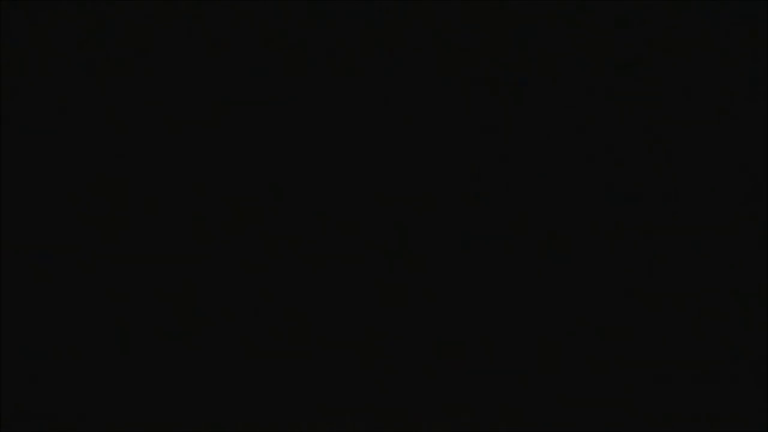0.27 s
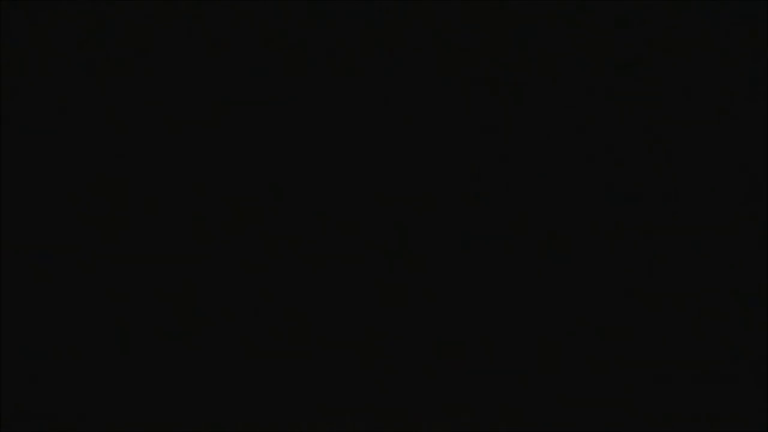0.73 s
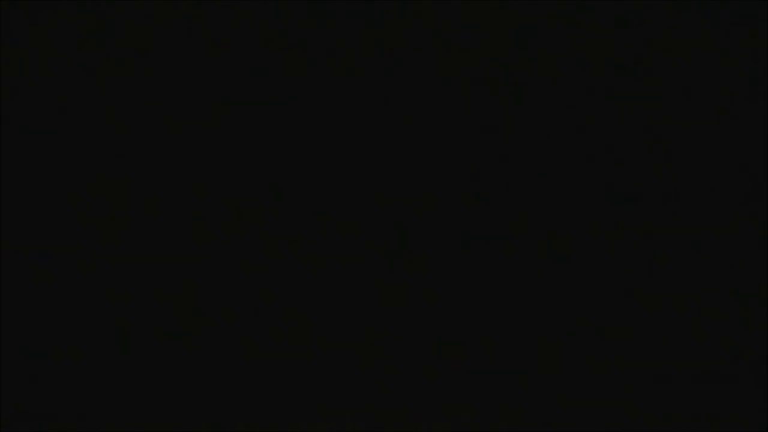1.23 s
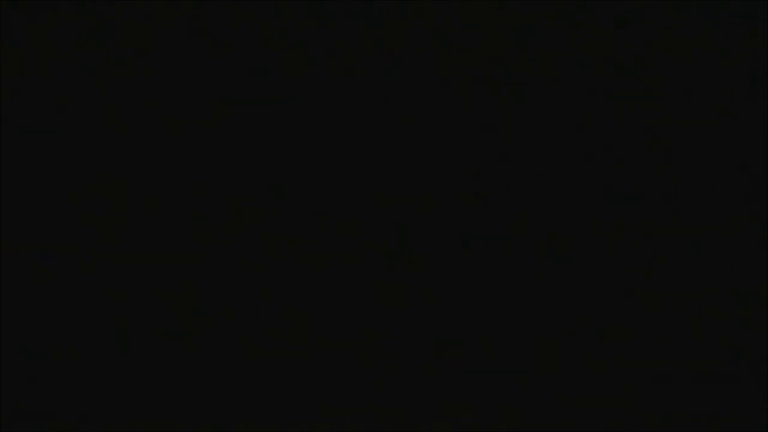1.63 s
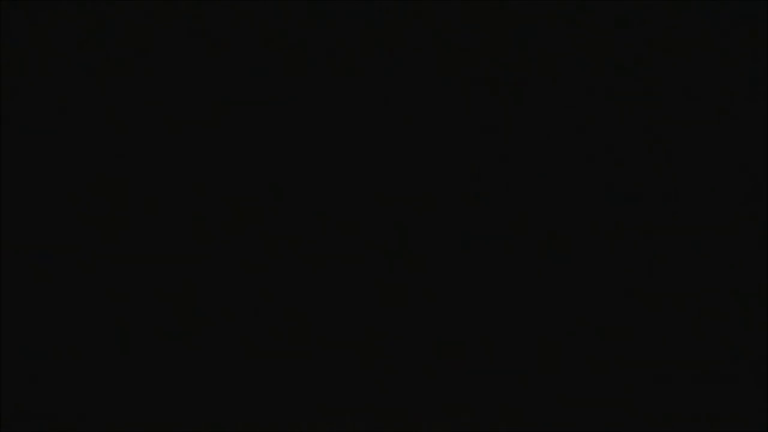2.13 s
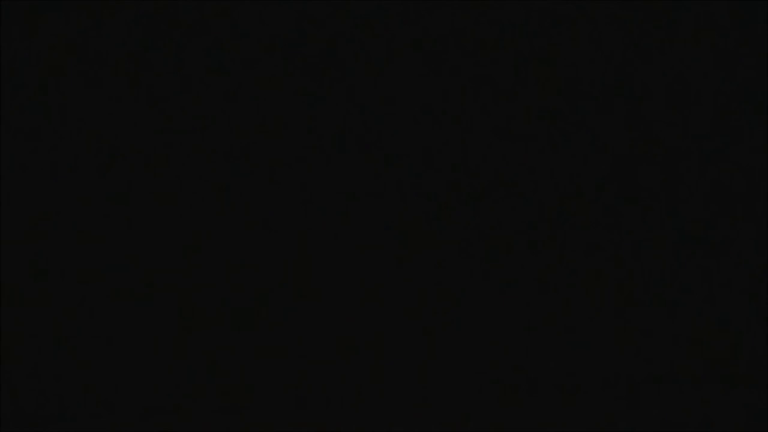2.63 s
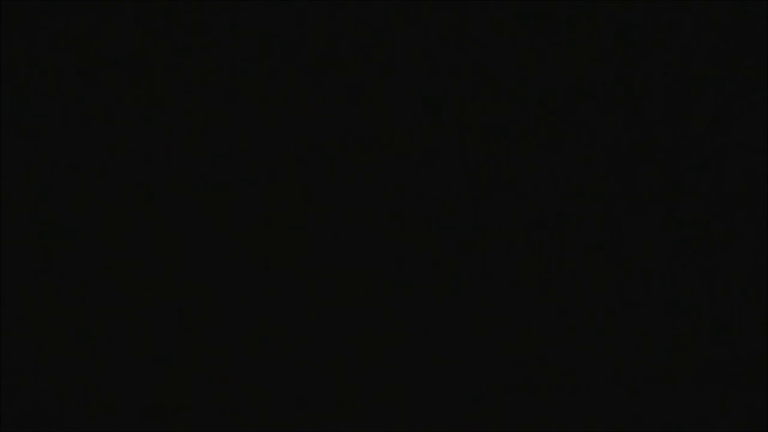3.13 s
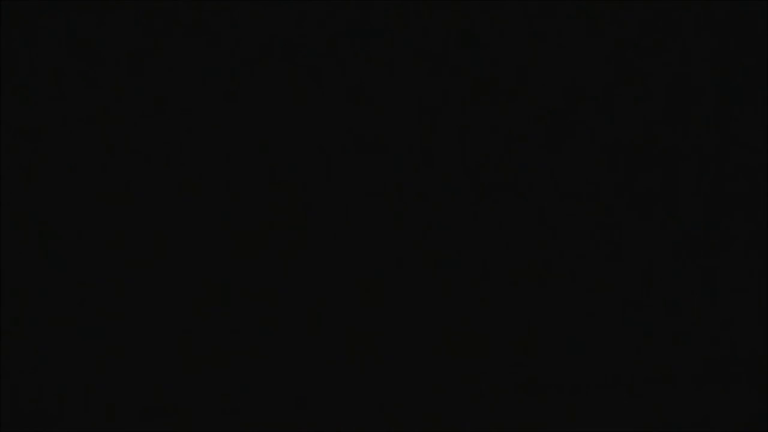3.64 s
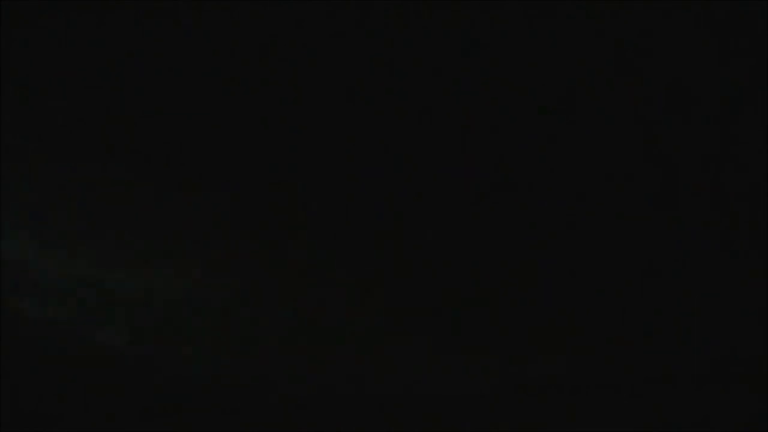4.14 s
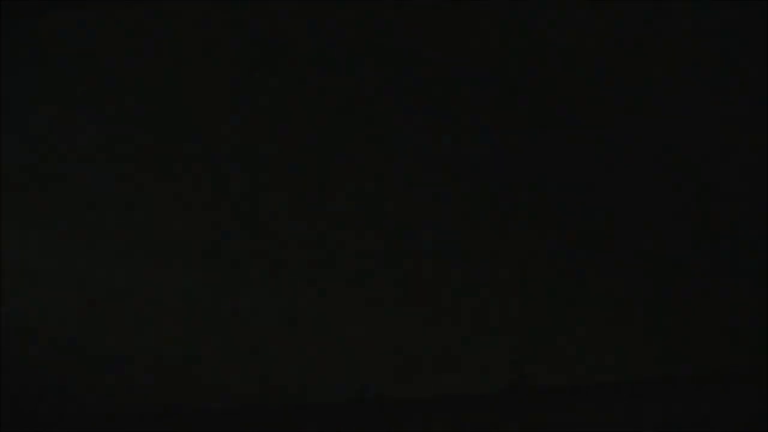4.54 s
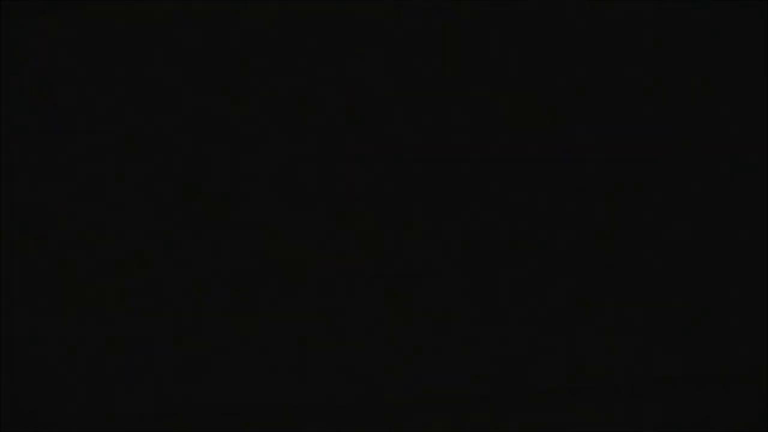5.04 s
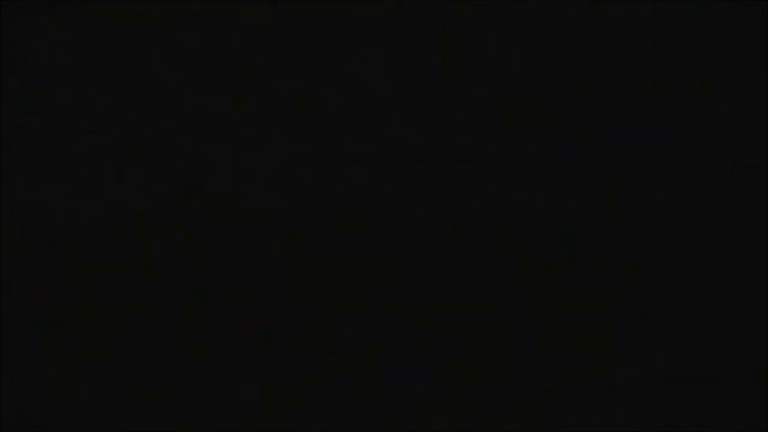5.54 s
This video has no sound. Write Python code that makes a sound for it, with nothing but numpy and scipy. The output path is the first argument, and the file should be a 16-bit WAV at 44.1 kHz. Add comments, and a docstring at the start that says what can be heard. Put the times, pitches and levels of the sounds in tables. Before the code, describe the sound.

A long peal of thunder starts abruptly, mid-roll, with dense low-mid rumbling and quick muffled crackles. Strong surges come just after one second and again around three and a half, with hollow booms between them. After four seconds it recedes into soft grumbles, and a steady light hiss rises. Open night air, mono microphone, automatic level, little deep bass.

```python
"""Distant thunder over soft hiss

A dense train of shock fronts, dulled by the air, makes a roll that swells and fades; narrow bands of it boom.
Sharper claps crackle out of the roll, each a leading front with scattered fronts, echoes and a thud.
Filtered noise and random pulses make a steady hiss like light rain. Pressure waves too deep to hear push
the recorder's gain down; it creeps back, so the hiss rises as the thunder dies away."""
import sys
import numpy as np
from scipy import signal
from scipy.io import wavfile
from scipy.ndimage import uniform_filter1d

SR = 44100
rng = np.random.default_rng(int(sys.argv[2]) if len(sys.argv) > 2 else 0)


def store_wav(level_fs):
    """Save 16-bit WAV to argv[1]."""
    pcm = np.round(np.clip(np.atleast_2d(level_fs), -1, 1) * 32767)
    wavfile.write(sys.argv[1], SR, pcm.T.astype(np.int16))


N = 254456
TIME, FREQ = np.arange(N) / SR, np.fft.rfftfreq(N, 1 / SR)  # s, Hz

# colour of the thunder, its treble lost in the air: f/Hz, relative density/dB per Hz
THUNDER_COLOUR = [(25, -66), (43, -24), (57, -37), (74, -15.5), (100, -16), (145, -6), (185, 1), (420, 3),
                  (600, -2), (950, -13.5), (1300, -24), (2000, -35), (3000, -53), (6000, -64)]


def gain_of(db):
    """Turns decibels into an amplitude factor."""
    return 10 ** (np.asarray(db) / 20)


def evened(x):
    """Scales to rms 1."""
    return x / np.sqrt(np.mean(x ** 2) + 1e-20)


def smoothed_twice(x, size):
    """Two moving averages in a row, each size samples long."""
    return uniform_filter1d(uniform_filter1d(x, size), size)


def steadied(x, span_s):
    """Evens out the slow swells of a random texture and keeps its grain."""
    power = smoothed_twice(x ** 2, int(span_s * SR))
    return x / np.sqrt(abs(power) + 1e-12)


def butter(x, order, hz, kind="low"):
    """Runs x through a causal Butterworth filter."""
    return signal.sosfilt(signal.butter(order, hz, kind, fs=SR, output="sos"), x)


def read(points, hz):
    """Reads a spectrum table on a log-frequency axis."""
    f, value = np.transpose(points)
    return np.interp(np.log(hz + 1), np.log(f), value)


def band(lo_hz, hi_hz):
    """Gain in dB of a band with steep, smooth edges."""
    low_edge = 1 + (lo_hz / (FREQ + 1)) ** 12
    high_edge = 1 + (FREQ / hi_hz) ** 12
    return -10 * np.log10(low_edge * high_edge)


def colour(x, db):
    """Minimum-phase filter shaped by db, scaled to unit energy: each pulse keeps its sharp front."""
    log_gain = np.log(gain_of(np.maximum(db - db.max(), -100)))
    circle = np.concatenate([log_gain, log_gain[-2:0:-1]])
    # the Hilbert transform of the log gain gives the minimum phase
    spectrum = np.exp(np.conj(signal.hilbert(circle)))
    taps = np.fft.ifft(spectrum).real[:8192]
    return signal.oaconvolve(x, taps / np.linalg.norm(taps))[:N]


def bell(top_s, length_s):
    """A smooth rise and fall of height 1, down 17 dB at length_s either side of its top."""
    return np.exp(-2 * ((TIME - top_s) / length_s) ** 2)


def shocks(per_s, spread_db):
    """Shock fronts from the kinks of the lightning channel: random times, many weak and a few strong."""
    size = gain_of(spread_db * np.minimum(rng.exponential(1, N), 4))
    sign = rng.choice([-1, 1], N)
    arrives = rng.random(N) < per_s / SR
    return evened(size * sign * arrives)


def mirrored(fronts, share, delay_s, drift):
    """Each front returns from the ground; the delay wanders as the sound moves along the channel."""
    knots = np.arange(0, TIME[-1] + .2, .2)
    wander = np.interp(TIME, knots, rng.standard_normal(len(knots)))
    delay = delay_s * np.exp(drift * wander)
    source = np.arange(N) - (delay * SR).astype(int)
    return fronts + share * fronts[np.clip(source, 0, N - 1)]


def peals(x, db):
    """Three peals from different parts of the sky: nearby echoes favour and cancel different bands in each."""
    # echo ripple of each peal, added to the colour: f/Hz, distance to 1/e^2 of the lift/Hz, lift/dB
    first_peal = [(151.7, 16, 5), (194, 18, 4.5), (254, 13, -5), (362.5, 49, -2.5), (423, 39, 0.5),
                  (456.6, 13, -8), (519, 39, -4.5), (564, 76, 4), (609, 33, -4.5), (663, 6.3, -12.5),
                  (800, 72, -3), (955, 50, 4.5), (1130, 37, -5.5)]
    second_peal = [(111, 19, 3.5), (171.4, 38, 8), (184, 8.7, -0.5), (222, 20, 1.5), (301, 23, -7),
                   (341, 18, -4.5), (404, 50, 1.5), (515, 110, -5.5), (624.7, 11.5, 7.5), (677, 16, 4),
                   (805, 14, 9.5), (830, 26, -3), (1277, 15, 6)]
    third_peal = [(180, 122, 9.5), (251, 56, -6), (307.4, 42, 6), (348, 22, -7.5), (510, 83, 1),
                  (570, 10, -1), (660, 34, 4.5), (792, 36, 4), (843, 60, -2.5), (900, 67, 4),
                  (987, 36, 5.5)]
    # middle of the fade from each peal to the next: t/s
    peal_changes = [2.165, 3.9]
    fade_edges = np.add.outer(peal_changes, [-.08, .08]).ravel()
    turn = np.interp(TIME, fade_edges, [0, 1, 1, 2])
    out = np.zeros(N)
    for k, bands in enumerate([first_peal, second_peal, third_peal]):
        ripple = sum(lift * np.exp(-2 * ((FREQ - hz) / width) ** 2) for hz, width, lift in bands)
        presence = np.maximum(1 - abs(turn - k), 0)
        out += presence * colour(x, db + ripple)
    return out


def lumps(depth_db, span_s):
    """A slow random gain, depth_db rms: the roll is never quite even."""
    drift = smoothed_twice(rng.standard_normal(N), int(span_s * SR))
    return gain_of(depth_db * evened(drift))


def roll_levels():
    """Envelopes of body, deep rumble and crackle: each swell adds its power to the steady roll."""
    # steady roll under the swells: t/s, body level/dB, deep rumble level/dB, crackle level/dB
    steady_roll = [(0.0, -19.5, -24.5, -33), (0.45, -26.5, -35, -33), (0.751, -23, -31.5, -33.5),
                   (1.02, -22.5, -23, -34), (1.4, -19.5, -27, -32.5), (1.6, -20.5, -32.5, -35),
                   (2.05, -19.5, -24, -32), (2.7, -23, -25, -36.5), (3.1, -27, -41, -38.5),
                   (3.4, -23.5, -28.5, -37), (3.6, -20.5, -25, -37), (3.88, -24, -26.5, -39.5),
                   (4.6, -29, -38.5, -45), (5.15, -34.5, -43, -51.5), (5.77, -39.5, -42.5, -66)]
    # a stretch of the lightning channel heard all at once:
    # t of the top/s, time from top to -17 dB/s, body level/dB, deep rumble level/dB
    swells = [(0.007, 0.035, -12.5, -14.5), (0.17, 0.12, -14.5, -21), (0.39, 0.11, -16, -19.5),
              (0.507, 0.07, -17.5, -20.5), (0.648, 0.11, -18, -27.5), (0.788, 0.035, -22, -39),
              (0.86, 0.02, -16.5, -29), (0.92, 0.048, -16, -23), (1.153, 0.044, -9.5, -14.5),
              (1.204, 0.027, -15, -20), (1.257, 0.048, -14.5, -27), (1.34, 0.07, -19.5, -28),
              (1.49, 0.025, -15.5, -23.5), (1.535, 0.084, -16, -27), (1.66, 0.079, -16.5, -28),
              (1.775, 0.07, -29, -25.5), (1.856, 0.11, -17, -30), (1.91, 0.015, -17.5, -23.5),
              (2.024, 0.018, -25, -27), (2.468, 0.038, -17.5, -17.5), (2.605, 0.043, -18, -23),
              (2.87, 0.067, -17, -17.5), (2.914, 0.051, -20, -26), (3.006, 0.098, -19.5, -20.5),
              (3.322, 0.07, -22, -26), (3.516, 0.028, -21, -31), (3.994, 0.038, -26.5, -22.5),
              (4.13, 0.055, -24.5, -23), (4.213, 0.053, -20.5, -29), (4.347, 0.051, -20, -31),
              (4.454, 0.05, -28.5, -42), (4.57, 0.035, -27.5, -32), (4.61, 0.033, -32, -32),
              (4.77, 0.045, -27.5, -39.5), (4.87, 0.04, -37, -43), (4.935, 0.021, -33, -45),
              (5.03, 0.026, -40, -39), (5.116, 0.04, -38, -38), (5.285, 0.059, -35, -44),
              (5.488, 0.075, -36, -34.5), (5.585, 0.025, -38, -33), (5.645, 0.056, -38, -41)]
    swell_crackle_db = -17  # relative to the body of the swell
    s, *levels = np.transpose(steady_roll)
    power = gain_of([np.interp(TIME, s, db) for db in levels]) ** 2
    for top_s, length_s, body_db, deep_db in swells:
        tops = gain_of([body_db, deep_db, body_db + swell_crackle_db])
        power += np.outer(tops, bell(top_s, length_s)) ** 2
    return np.sqrt(power)


def roll():
    """Far fronts merge into a deep rumble; nearer ones stay apart and crackle."""
    body, deep, crackle = roll_levels() * lumps(depth_db=1.02, span_s=0.024)
    air = read(THUNDER_COLOUR, FREQ)
    fronts = shocks(per_s=1500, spread_db=1)
    fronts = mirrored(fronts, share=0.27, delay_s=.008, drift=.15)
    rumble = deep * steadied(peals(fronts, air + band(4.7, 242.5)), span_s=0.043)
    middle = body * steadied(peals(fronts, air + band(288.4, 904)), span_s=0.031)
    top = crackle * steadied(peals(fronts, air + band(1025, 8000)), span_s=0.017)
    return rumble + middle + top


def hiss():
    """A fine, even hiss of countless far drops: noise plus random pulses, coloured together."""
    hiss_colour = [(100, -11.5), (800, 6.5), (2000, 1.5), (3200, 1.5), (4000, -2), (4800, -1.5),
                   (6000, -5.5), (7200, -6), (9000, -9.5), (11000, -14), (13500, -19.5), (15600, -22.5)]  # spectrum of the drops: f/Hz, relative density/dB per Hz
    hiss_db = -45.5  # rms, ahead of the gain control
    drops = rng.standard_normal(N) + 0.54 * shocks(per_s=3000, spread_db=4.0)
    return gain_of(hiss_db) * evened(colour(drops, read(hiss_colour, FREQ)))


def pressure_waves():
    """Slow pushes of air from the thunder, below hearing."""
    # pushes of air, ahead of the low cut: t of the peak/s, peak level/dB
    waves = [(0.01, -6.5), (0.131, -3.5), (0.23, -3.5), (0.413, -2), (0.876, -10.5), (0.966, -5),
             (1.147, -4), (1.481, -8.5), (1.544, -5), (1.896, -9.5), (2.037, -5.5), (2.15, -3),
             (2.271, -2.5), (2.462, -7), (2.597, -6.5), (2.863, -7), (3.03, -8.5), (3.216, -10),
             (3.358, -8.5), (3.559, -12), (3.642, -3.5), (3.791, -5), (3.9, -7), (4.231, -14),
             (4.338, -15.5)]
    wave_length_s = 0.061  # from the peak to -17 dB
    return sum(gain_of(db) * bell(s, wave_length_s) for s, db in waves)


def burst(start_s, length_s, level_db, t60, rise_s):
    """Envelope of a clap: quick rise, hold while its fronts arrive, exponential decay."""
    age = TIME[:SR]
    fade = np.maximum(age - length_s, 0) / max(t60, .02)
    rise = 1 - np.exp(-age / rise_s)
    decay = np.exp(-np.log(1000) * np.minimum(fade, 2))
    shape = gain_of(level_db) * rise * decay
    return np.pad(shape, (round(start_s * SR), N))[:N]


def claps():
    """A leading front, then scattered ones and their echoes, dulled by the clap's own path, over a thud."""
    # one row a clap: t/s, length of its cluster of fronts/s, crack level/dB,
    # leading front over the crack/dB, thud level/dB, top of the crack's treble/Hz
    clap_rows = [(0.08, 0.022, -27, 12, -15, 1800), (0.112, 0.01, -28, 20, -33, 2100),
                 (0.166, 0.007, -33, 17, -16, 1700), (0.323, 0.035, -26, 13, -22, 1400),
                 (0.378, 0.008, -29, 24, -15, 1400), (0.487, 0.0087, -28, 15, -17, 1700),
                 (0.635, 0.0071, -32, 18, -26, 1690), (0.825, 0.004, -35, 29.5, -22, 5500),
                 (0.837, 0.015, -18.5, 17, -17, 1200), (0.922, 0.0079, -26.5, 26, -12, 1400),
                 (1.071, 0.028, -30, 15, -18, 1800), (1.113, 0.012, -23.5, 17, -27, 2000),
                 (1.27, 0.005, -28, 17, -27, 2300), (1.2762, 0.005, -21.5, 27, -23, 2540),
                 (1.284, 0.004, -28, 21, -15, 2000), (1.357, 0.0052, -36, 27, -17, 2680),
                 (1.448, 0.012, -29.5, 20, -18.5, 1700), (1.486, 0.013, -19.5, 21, -20, 1700),
                 (1.637, 0.01, -29.5, 13, -23, 1700), (1.964, 0.0086, -34, 20, -20, 2100),
                 (2.021, 0.014, -29, 21, -13, 3400), (2.0516, 0.012, -22.5, 30, -33, 2100),
                 (2.153, 0.013, -30, 11, -11.5, 2200), (2.182, 0.0051, -34, 26, -22, 1600),
                 (2.303, 0.021, -24, 14, -16, 1700), (2.601, 0.006, -36, 29, -19, 1400),
                 (3.146, 0.0083, -45, 20, -22.5, 1780), (3.199, 0.014, -23.5, 22, -14, 1650),
                 (3.228, 0.0062, -38, 20, -31, 1500), (3.332, 0.026, -29, 17, -22, 1610),
                 (3.559, 0.0065, -31.5, 28, -14, 1300), (3.599, 0.0088, -21.5, 27, -13.5, 1490),
                 (3.611, 0.0079, -24, 25, -13, 1900), (3.73, 0.026, -25.5, 26, -19, 1550),
                 (3.964, 0.023, -39, 15, -24, 1700), (4.488, 0.005, -43, 20, -24.5, 1800)]
    crack_colour = [(200, -42.5), (600, 6.5), (1000, 10), (1700, 2.5), (2400, -2.5), (3300, -7.5),
                    (5000, -22), (9000, -51)]  # spectrum of a clap before its path: f/Hz, relative density/dB per Hz
    crack_rise_s, crack_t60_s, thud_rise_s, thud_t60_s = 0.0013, 0.13, 0.0014, 0.18
    # the surroundings answer a front a moment later and ring on
    echo_delay_s, echo_db, echo_t60_s = 0.0015, -6, 0.27
    fronts, bright = shocks(per_s=1500, spread_db=3.5), read(crack_colour, FREQ)
    scatter = steadied(colour(fronts, bright), span_s=0.003)
    front = colour(signal.unit_impulse(N), bright)
    crack, thud = np.zeros((2, N))
    for s, length_s, crack_db, front_db, thud_db, top_hz in clap_rows:
        near = burst(s + echo_delay_s, length_s, crack_db, crack_t60_s, crack_rise_s)
        far = burst(s + echo_delay_s, length_s, crack_db + echo_db, echo_t60_s, crack_rise_s)
        leading = gain_of(crack_db + front_db) * np.roll(front, round(s * SR))
        cluster = scatter * np.maximum(near, far) + leading
        crack += butter(cluster, 3, top_hz)
        thud += burst(s, length_s, thud_db, thud_t60_s, thud_rise_s)
    thud_colour = read(THUNDER_COLOUR, FREQ) + band(117, 1010)
    thud *= steadied(peals(fronts, thud_colour), span_s=0.0056)
    return crack + butter(thud, 3, 100, "high")


def booms():
    """Narrow bands of the fronts swell and fade, and give the roll a pitch."""
    # one row a boom: t of the top/s, time from top to -17 dB/s, pitch/Hz, level/dB
    boom_rows = [(0.103, 0.046, 135.6, -22), (0.342, 0.066, 204, -17.5), (0.846, 0.028, 867, -27),
                 (0.847, 0.03, 550, -22), (0.863, 0.035, 193, -19), (0.927, 0.025, 550, -21),
                 (1.093, 0.091, 109, -33), (1.141, 0.029, 562.5, -9), (1.31, 0.13, 556.6, -17),
                 (1.458, 0.033, 567.5, -13.5), (1.51, 0.1, 102, -30), (1.84, 0.056, 559, -16.5),
                 (2.25, 0.25, 113, -33.5), (2.923, 0.037, 412, -15.5), (3.24, 0.12, 213, -22.5),
                 (3.474, 0.069, 364, -20), (3.51, 0.045, 484.4, -19), (3.557, 0.044, 215.6, -21),
                 (3.625, 0.05, 114, -24), (3.765, 0.09, 111, -31), (4.237, 0.043, 309.4, -20),
                 (4.348, 0.029, 308, -18.5), (4.429, 0.056, 191.6, -25), (4.761, 0.083, 311, -28.5),
                 (4.818, 0.05, 128, -42), (5.378, 0.066, 307, -32)]
    widest_hz = 42.4  # low booms are narrower: a quarter of their pitch
    fronts, out = shocks(per_s=1500, spread_db=3.5), np.zeros(N)
    for top_s, length_s, hz, db in boom_rows:
        edges = hz + np.array([-.5, .5]) * min(widest_hz, hz / 4)
        narrow = butter(fronts, 3, edges, "band")
        out += gain_of(db) * bell(top_s, length_s) * steadied(narrow, span_s=0.019)
    return out


def scene():
    """Thunder over the hiss, one channel."""
    return (roll() + hiss() + pressure_waves() + claps() + booms())[None]


def record(dry):
    """Gain control hears the pressure waves, falls fast and recovers slowly; a low cut removes them."""
    limit_db, recovery_db_per_s, react_s = -18.5, 26.5, 0.0131
    size, recovered = int(react_s * SR), recovery_db_per_s * TIME
    power_db = 10 * np.log10(abs(uniform_filter1d(dry[0] ** 2, size)) + 1e-12)
    excess_db = np.maximum(power_db - limit_db, 0)
    # hold the deepest cut so far, less what has recovered since
    cut_db = np.maximum.accumulate(excess_db + recovered) - recovered
    low_cut = signal.butter(4, 29, "high", fs=SR, output="sos")
    heard = signal.sosfiltfilt(low_cut, dry, padtype="even", padlen=SR // 4)
    held = heard * gain_of(-uniform_filter1d(cut_db, size))
    # steep limit at the top of the band, Hz
    band_limit = signal.firwin(801, 15680, window=("kaiser", 9), fs=SR)
    return signal.oaconvolve(held, band_limit[None], "same")


dry = scene()
out = record(dry)
store_wav(out)
```